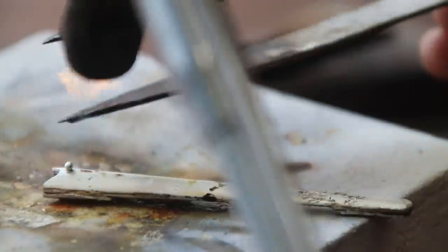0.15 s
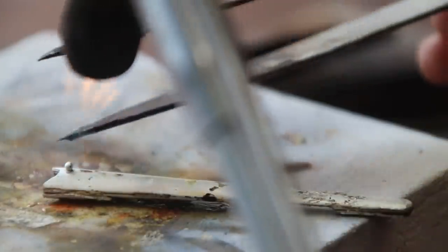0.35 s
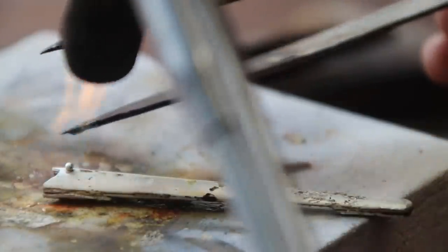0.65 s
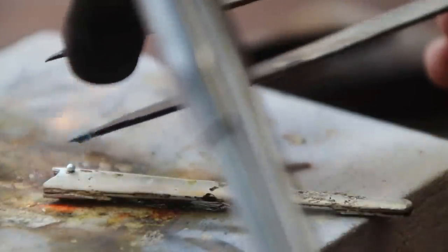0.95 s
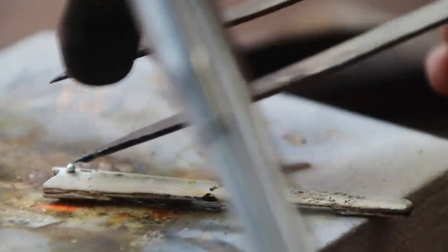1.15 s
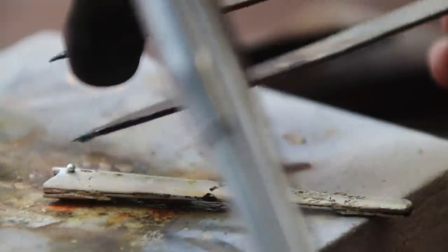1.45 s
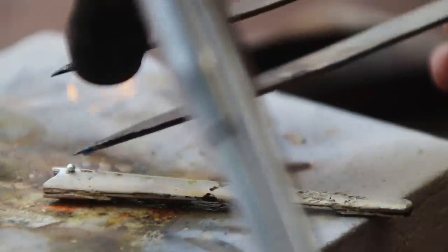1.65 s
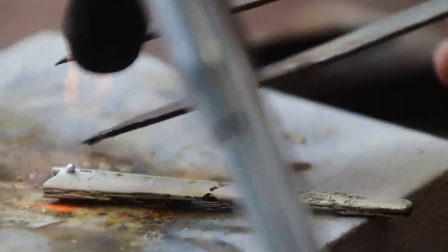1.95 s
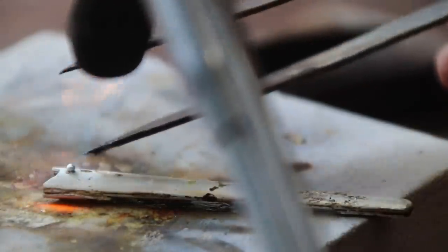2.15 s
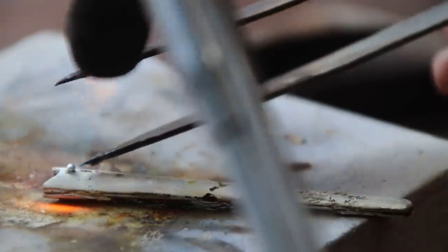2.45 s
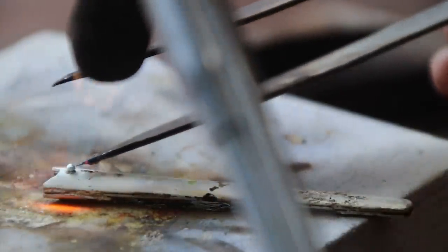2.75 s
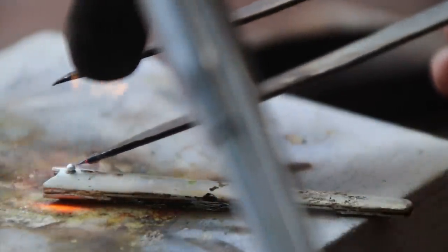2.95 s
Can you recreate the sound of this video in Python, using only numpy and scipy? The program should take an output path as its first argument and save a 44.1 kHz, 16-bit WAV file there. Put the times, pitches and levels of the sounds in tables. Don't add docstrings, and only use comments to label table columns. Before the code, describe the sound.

Close up, a pump-fed torch hisses in quick pulses, drops almost to silence with faint crackles and a wavering squeak, then abruptly relights and hisses on, with short workshop reflections around it.

```python
import sys
import numpy as np
from scipy import signal
from scipy.fft import rfft, irfft
from scipy.io import wavfile
from scipy.ndimage import uniform_filter1d

SR = 44100
rng = np.random.default_rng(int(sys.argv[2]) if len(sys.argv) > 2 else 0)


def convert_level_to_amplitude(level_db):
    exponent = np.asarray(level_db, float) / 20
    return 10 ** exponent


def int16_out(signal):
    q = np.round(np.clip(np.atleast_2d(signal).T, -1, 1) * 32767)
    wavfile.write(sys.argv[1], SR, q.astype(np.int16))


N = 136710

# time of the surge front in seconds, surge in dB, starving before it in dB,
# thud level in dB, level of the room boom in dB.
STROKES = [(0.094, 3, 1.2, -71, -70), (0.241, 2.5, 3.5, -41.5, -62.5), (.398, 2.5, 1, -51, -60),
           (.475, -1, 2, -50, -66), (0.558, 1.5, 2, -41, -57), (0.721, 3, 2, -43, -58),
           (0.881, 2, 2, -43.5, -53.5), (1.041, 1.5, -0.3, -46.5, -62), (1.19, 1.5, 1.5, -56, -69),
           (1.355, 4.5, -1.6, -67, -87), (1.545, -8, 0, -68, -85), (1.648, -1, 1, -64, -66),
           (1.67, 2, 3, -56, -74), (1.834, 1.5, 3.5, -51, -64), (1.984, 3, 3.3, -42, -54),
           (2.143, 4, 0, -50, -60), (2.297, 3, 0.5, -42, -51), (2.451, 3.5, 0, -47, -55),
           (2.609, 5.5, -1.9, -44, -66), (2.76, 1.5, -0.9, -60, -73), (2.919, -0.5, -1.2, -62, -86)]


def level(x, db):
    return x * convert_level_to_amplitude(db) / np.sqrt(np.mean(x ** 2))


def read(table, x, col=1):
    table = np.array(table)
    return np.interp(x, table[:, 0], table[:, col])


def colour(table, f):
    hz, db = np.array(table)[:, :2].T
    return convert_level_to_amplitude(np.interp(np.log(f + 1), np.log(hz), db))


def walk(rate):
    hold = int(SR / rate)
    steps = np.repeat(rng.standard_normal(N // hold + 1), hold)
    return 1.3 * uniform_filter1d(uniform_filter1d(steps, hold), hold)[:N]


def shaped(table):
    white = rfft(rng.standard_normal(N))
    return irfft(white * colour(table, np.fft.rfftfreq(N, 1 / SR)), N)


def decay(t, t60):
    return np.exp(-np.log(1000) * t / t60)


def workshop_air():
    # frequency in Hz, density in dB per Hz.
    air = [(18, -36), (60, -14), (150, -9.5), (300, -7), (1000, -7.5), (3100, -11), (3850, -3.5),
           (5500, -14), (15500, -56)]
    return level(shaped(air), -57)


def reverberation(dry, t):
    lag = t[:SR // 4]
    echo = rng.standard_normal(len(lag)) * decay(lag, 0.2) * (lag > .002)
    echo *= convert_level_to_amplitude(-9) / np.sqrt(np.sum(echo ** 2))
    return signal.fftconvolve(dry, echo)[:N]


def sputters(t):
    # start in seconds, frequency in Hz, level in dB, 60 dB decay time in seconds.
    pops = [
        (1.363, 1310, -33, .011),
        (1.382, 1310, -31, 0.011),
        (1.396, 1340, -33, 0.021),
        (1.427, 1380, -36, 0.012),
        (1.426, 2560, -34, 0.013),
        (1.665, 555, -30, 0.010),
        (1.679, 3100, -33, 0.012),
        (1.964, 590, -19.5, 0.015),
        (2.03, 2470, -14.5, 0.021),
    ]
    out = np.zeros(N)
    for start, hz, db, t60 in pops:
        since = np.clip(t - start, 0, 1)
        onset = np.tanh(since / 0.0012)
        out += convert_level_to_amplitude(db) * np.sin(2 * np.pi * hz * since) * decay(since, t60) * onset
    return out


def valve_whistle(t):
    # time in seconds, pitch in Hz, level in dB, extra level of partials above the fourth in dB,
    # unsteadiness as a factor.
    squeak = [
        (1.375, 1378, -61, -10, 2.5),
        (1.41, 1325, -57, -8, 2.2),
        (1.445, 1265, -56, 1, 1.2),
        (1.485, 1218, -61, 1, 1.1),
        (1.528, 1165, -70, 0, 1.4),
        (1.552, 1315, -58, 1, .8),
        (1.57, 1322, -56, 4, .6),
        (1.588, 1238, -56.5, 3, .7),
        (1.625, 1165, -67, 3, 1.1),
        (1.665, 1125, -76, 0, 1.5),
    ]
    # multiple of the pitch, level in dB, dB gained per 100 Hz of pitch.
    partials = [(1, -3.5, 0.5), (2, -4, -6), (3, -2.5, 3), (4, .5, -1), (5, -1, 9), (6, -4, 2), (7, -11, 5),
                (8, -14, 4), (9, -17, 4), (10, -20, 4), (11, -24, 4)]
    # frequency in Hz, density in dB per Hz.
    breath = [(1500, -30), (3600, -16), (3800, 7), (4050, -10), (5000, -4), (7500, -5), (10000, -14),
              (15500, -26)]
    wobble, flicker_db = .007, 3.2
    hz = uniform_filter1d(read(squeak, t), size=SR // 110)
    unsteady_hz = hz * (1 + wobble * read(squeak, t, col=4) * walk(500))
    phase = 2 * np.pi * np.cumsum(unsteady_hz) / SR
    high = (hz - 1310) / 100
    shine_db = read(squeak, t, col=3)
    tone = np.zeros(N)
    for k, db, rise_db in partials:
        partial_db = db + rise_db * high + (k > 4) * shine_db + flicker_db * walk(69.7)
        tone += convert_level_to_amplitude(partial_db) * np.sin(k * phase)
    fade_in = np.clip((t - squeak[0][0]) / 0.0084, 0, 1)
    fade_out = np.clip((squeak[-1][0] - t) / .02, 0, 1)
    source = np.sqrt(2) * tone + level(shaped(breath), -4)
    return source * convert_level_to_amplitude(read(squeak, t, col=2)) * fade_in * fade_out


def pump_thuds(t):
    # frequency in Hz, density in dB per Hz.
    thud_colour = [(30, -26), (70, -19), (130, -13), (185, 1.5), (260, -4), (600, -4), (1200, -12),
                   (3000, -40)]
    lead_s, thud_s = .017, .016
    boom_hz, boom_t60_s, boom_gain_db = 96.8, 0.66, 2
    puffs = np.zeros(N)
    booms = np.zeros(N)
    for front_s, _, _, db, boom_db in STROKES:
        since = t - front_s + lead_s
        puffs += convert_level_to_amplitude(db) * np.exp(-(since / thud_s) ** 2)
        onset = np.tanh(np.clip(since / thud_s + 1, 0, 9))
        booms += convert_level_to_amplitude(boom_db + boom_gain_db) * onset * decay(np.abs(since), boom_t60_s)
    return level(shaped(thud_colour), 0) * puffs + booms * np.sin(2 * np.pi * boom_hz * t)


def pumping(t):
    rise_s, sag_s, starve_s = .010, 0.075, 0.073
    swing = np.zeros(N)
    for front_s, surge_db, starve_db, _, _ in STROKES:
        since = t - front_s
        arrived = .5 + .5 * np.tanh(2 * since / rise_s)
        swing += arrived * surge_db * np.exp(-np.abs(since) / sag_s)
        swing -= (1 - arrived) * starve_db * np.exp(-(since / starve_s) ** 2)
    return swing


def jet(t):
    # time in seconds, jet level in dB.
    flow_table = [(0, -32.5), (.3, -32), (.6, -31.5), (.95, -34.5), (1.12, -34.5), (1.3, -40), (1.42, -53),
                  (1.51, -70), (1.6, -59), (1.68, -58), (1.691, -31.5), (1.79, -35), (1.94, -31),
                  (2.05, -30.5), (2.5, -32.5), (2.8, -34), (3.0, -36), (3.1, -42.5)]
    # frequency in Hz, density in dB per Hz.
    jet_colour = [(18, -60), (30, -27), (92, -12), (874, -5.5), (1590, -6), (2490, -5), (3590, -8),
                  (5310, -7), (15500, -23)]
    # frequency in Hz, width in Hz, gain over the colour in dB.
    body = [(95, 55, -5.5), (144, 75, -9), (184, 10, 5), (220, 12, 2), (255, 35, -1), (299, 10.6, 3.5),
            (547, 57, 5), (883, 60, 4), (1140, 43, 2.5), (1350, 700, 5.5), (1640, 250, -2.5),
            (2069, 210, 5), (2482, 266, 5), (2967, 900, 6), (3523, 130, -6.5), (5075, 860, 5),
            (7470, 1500, 2.5), (14900, 790, -15.5)]
    eddy_db, flicker_db, shared_db = 1.5, .6, .4
    surge_tilt = .17
    flow_tilt, bass_sag = -0.12, 0.093
    treble_lead_s = .004

    f = np.fft.rfftfreq(N, 1 / SR)
    body_db = sum(db / (1 + (2 * (f - hz) / width) ** 2) for hz, width, db in body)
    eddies = rng.standard_normal(N) * convert_level_to_amplitude(eddy_db * walk(700))
    noise = rfft(eddies) * colour(jet_colour, f) * convert_level_to_amplitude(body_db)
    noise /= np.std(irfft(noise, N))
    flow = read(flow_table, t)
    swing = pumping(t)
    shared = shared_db * walk(44.44)
    out = np.zeros(N)
    for octave in np.arange(-7, 3.1, .5):
        place = np.log2((f + 1) / 2000) - octave
        band = irfft(noise * np.cos(np.pi * np.clip(place, -.5, .5)) ** 2, N)
        follow = flow_tilt * max(octave, 0) + bass_sag * max(1 - octave, 0)
        db = flow + follow * (flow + 33) + max(1 + surge_tilt * octave, 0) * swing
        early_db = np.interp(t + treble_lead_s * np.clip(octave, 0, 2), t, db)
        out += band * convert_level_to_amplitude(early_db + shared + flicker_db * walk(14))
    return out


def scene():
    t = np.arange(N) / SR
    dry = sputters(t) + valve_whistle(t) + pump_thuds(t) + jet(t)
    mono = dry + reverberation(dry, t) + workshop_air()
    return np.array([mono, mono])


def band_limit(x):
    return signal.sosfilt(signal.butter(12, 15930, fs=SR, output="sos"), x)


def record(dry):
    hum = level(shaped([(30, 0), (400, -6), (1000, -30), (15000, -40)]), -91)
    side = hum * np.array([[1], [-1]])
    top_cut = signal.ellip(10, .3, 70, 15740, fs=SR, output="sos")
    return band_limit(signal.sosfilt(top_cut, dry + side))


dry = scene()
out = record(dry)
int16_out(out)
```